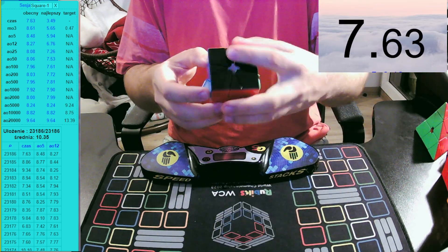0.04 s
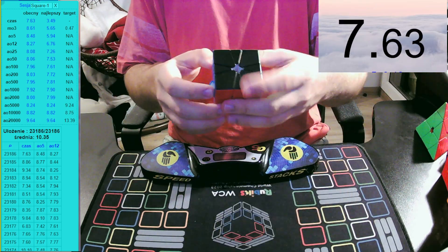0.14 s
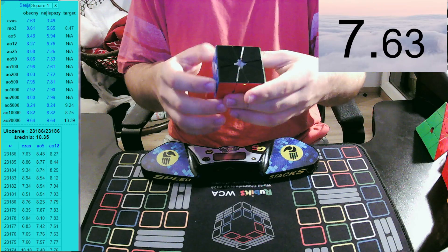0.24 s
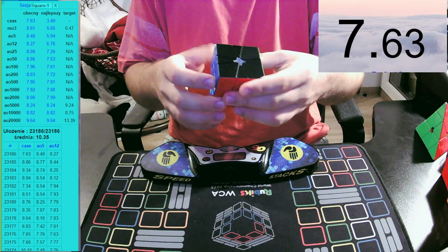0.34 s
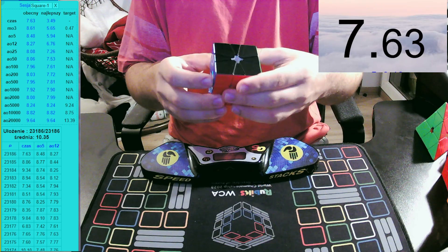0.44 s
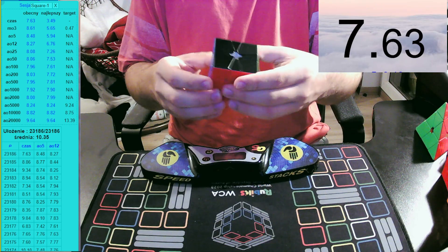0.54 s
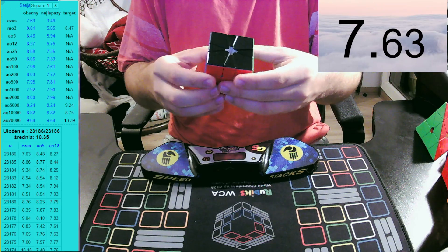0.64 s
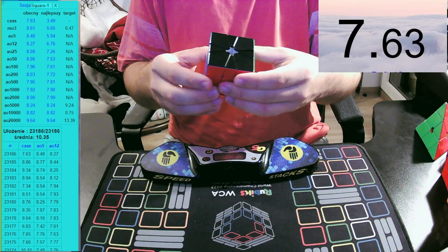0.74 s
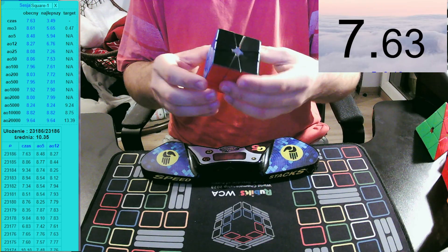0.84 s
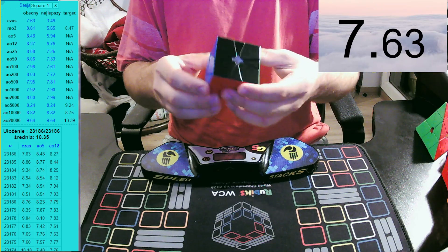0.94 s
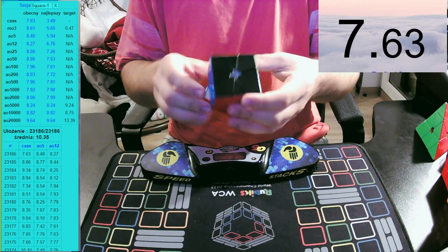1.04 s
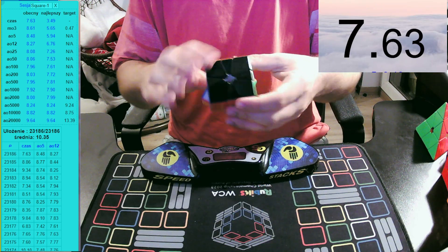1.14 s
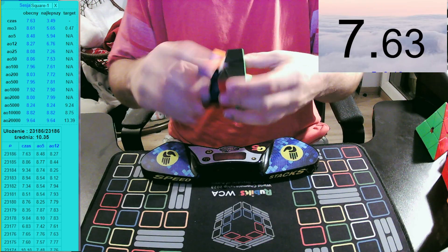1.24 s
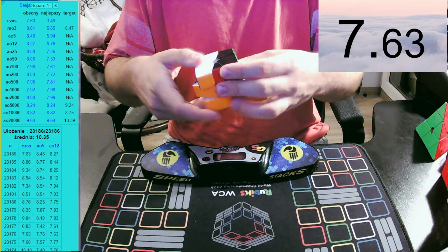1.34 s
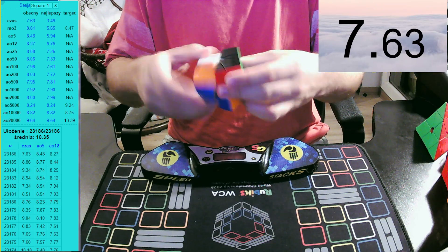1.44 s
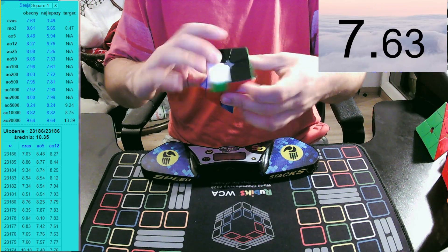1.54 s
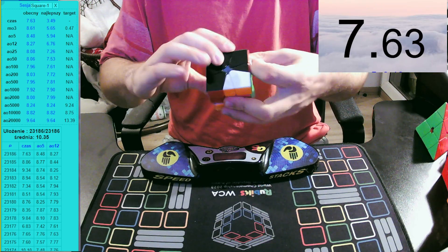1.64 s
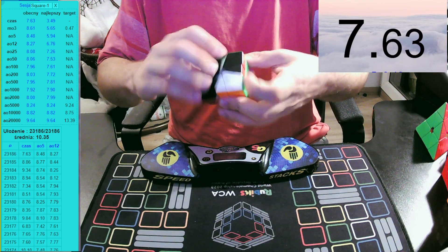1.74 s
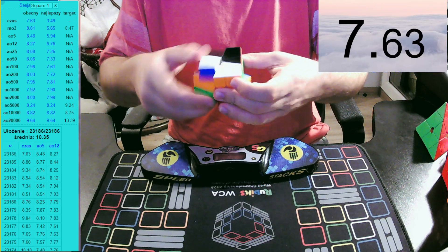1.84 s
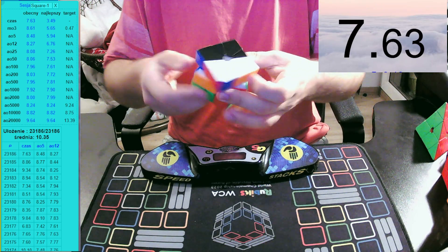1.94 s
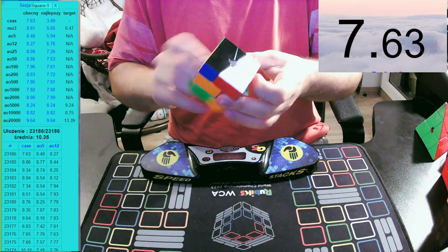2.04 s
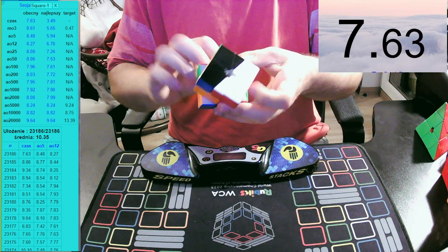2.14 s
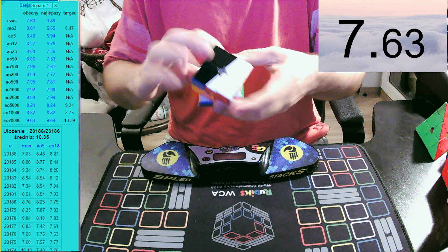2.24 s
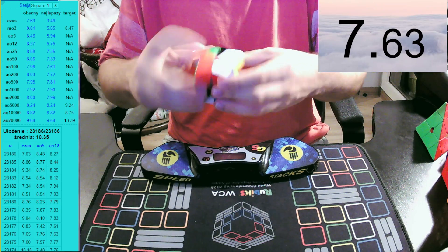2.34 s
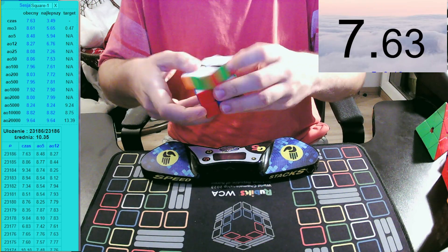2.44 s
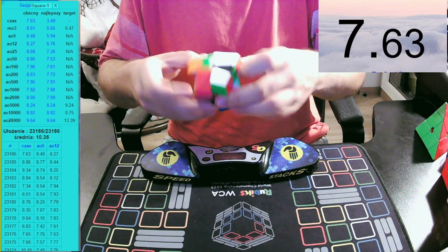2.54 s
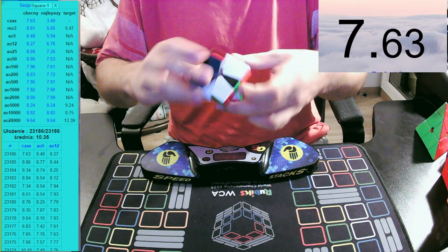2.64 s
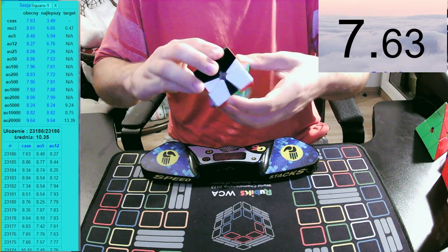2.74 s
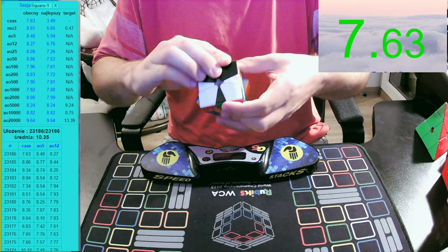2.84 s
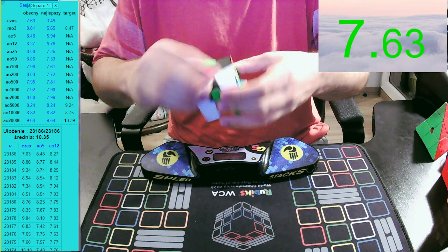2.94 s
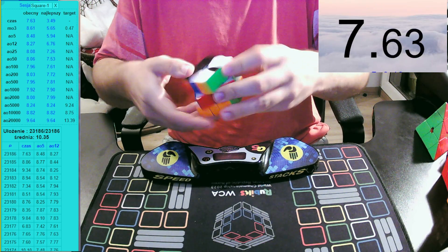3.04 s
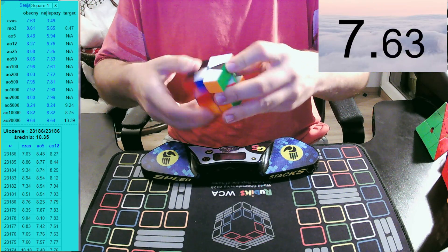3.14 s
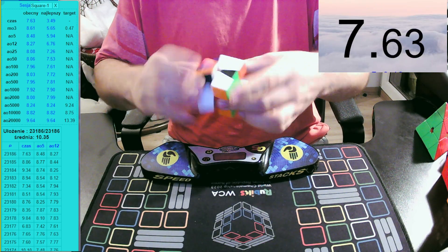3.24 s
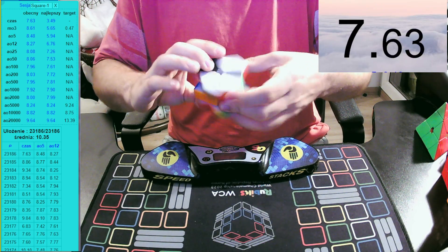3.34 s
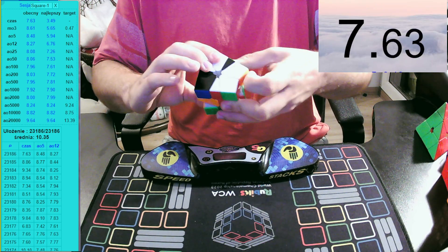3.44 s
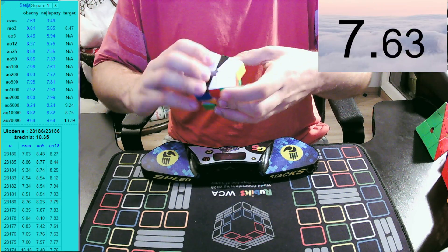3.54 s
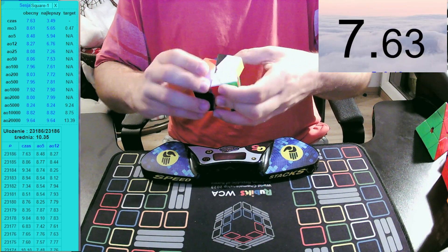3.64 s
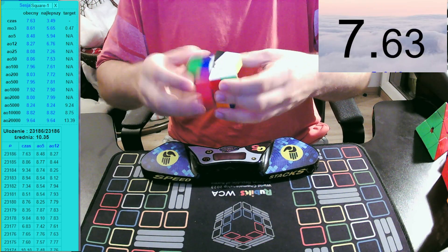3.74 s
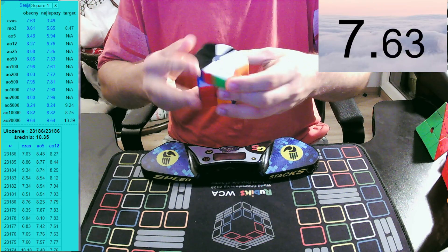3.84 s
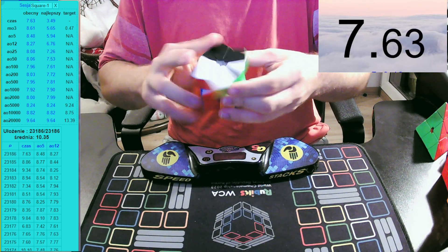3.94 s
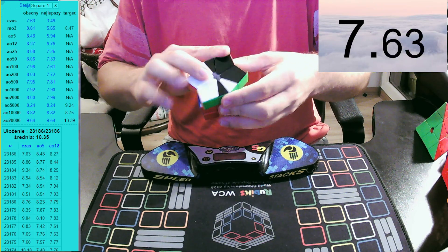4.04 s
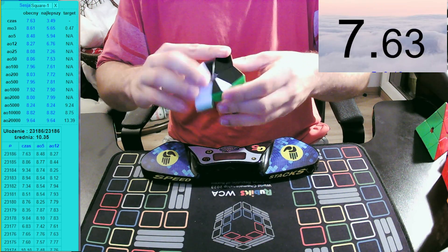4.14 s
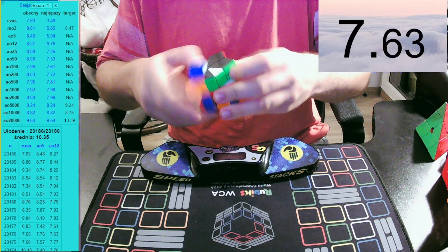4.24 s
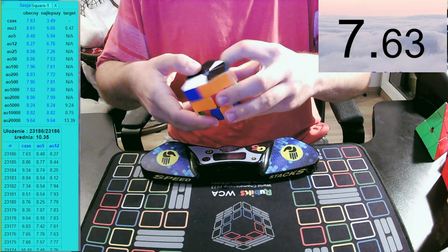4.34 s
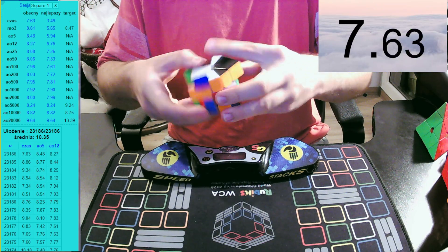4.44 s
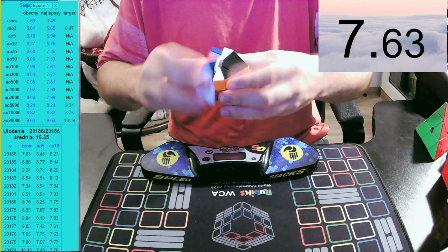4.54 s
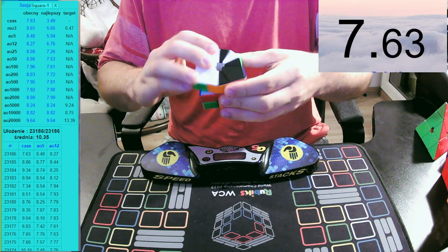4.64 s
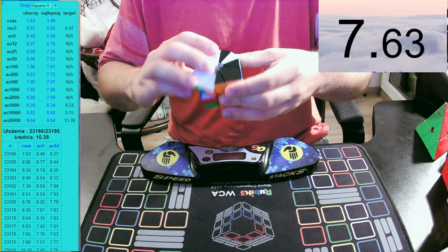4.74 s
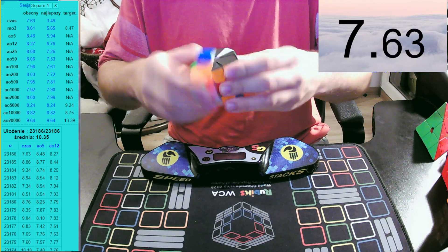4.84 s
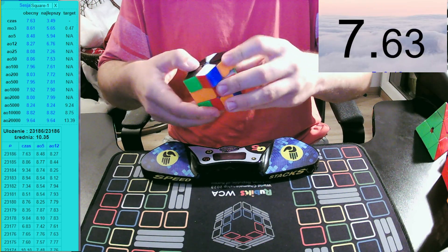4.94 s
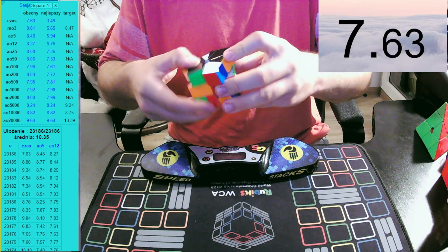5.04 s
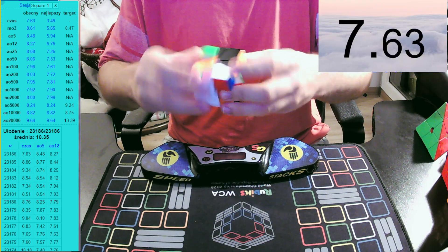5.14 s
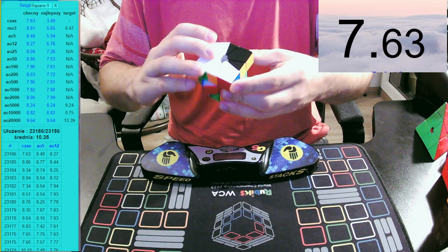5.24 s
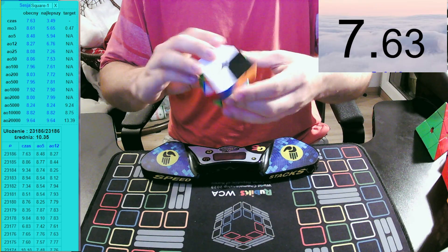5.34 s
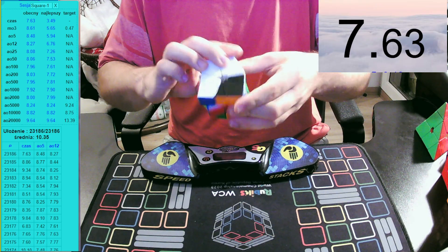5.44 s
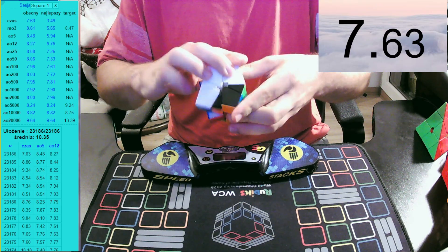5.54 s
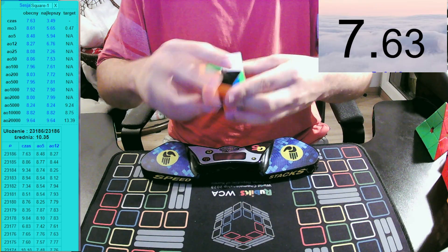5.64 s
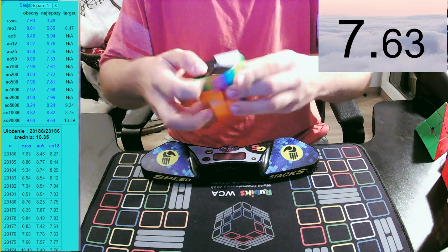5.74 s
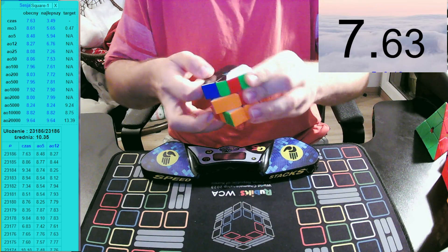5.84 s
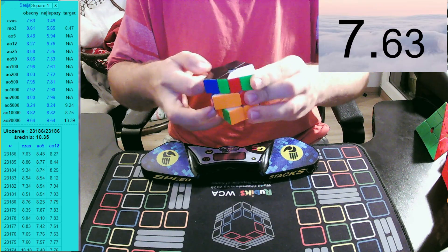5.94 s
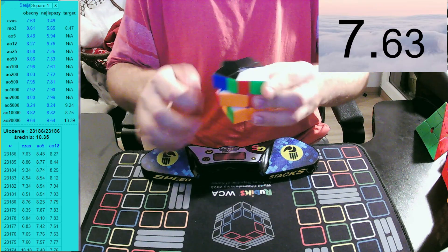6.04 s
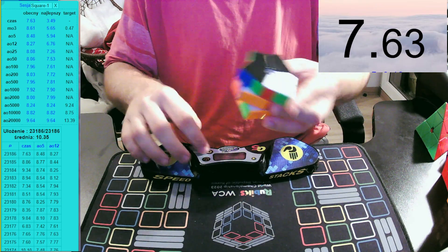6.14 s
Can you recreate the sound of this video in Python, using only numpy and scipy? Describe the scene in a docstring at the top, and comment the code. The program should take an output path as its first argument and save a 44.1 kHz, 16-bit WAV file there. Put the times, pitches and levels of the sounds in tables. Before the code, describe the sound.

A plastic puzzle cube is twisted in fast clacking bursts close to the microphone, rattling and sliding in a small humming room, ending with a soft thud.

```python
"""In a small room, a plastic puzzle cube is turned in quick bursts over a desk, close to the microphone.
Each turn ends in a clack: random knocks coloured by the resonances of loose hollow pieces.
Between the clacks the layers slide and rattle, made of small ticks and a dry hiss.
Mains hum and low room noise lie underneath, made of sine waves and shaped noise.
A low ring of two sine waves dies away from the start, and a soft thud comes at the end."""
import sys
import numpy as np
from scipy import signal
from scipy.fft import rfft, irfft
from scipy.io import wavfile

SR = 44100
rng = np.random.default_rng(int(sys.argv[2]) if len(sys.argv) > 2 else 0)


def put_to_file(sound):
    """Save the sound as 16-bit audio at rate SR, in the file named by the first command-line argument."""
    columns = np.atleast_2d(sound).T  # one column per channel
    safe = np.clip(columns, -1, 1)
    whole_steps = np.round(safe * 32767)
    wavfile.write(sys.argv[1], SR, whole_steps.astype(np.int16))


N = 272979
TIME = np.arange(N) / SR  # seconds

# The clacks of the cube. Each row: time of the hit in seconds, relative level in dB,
# hardness of the contact in dB, extra length of the rattle in ms.
CLACK_LIST = [(0.0652, -55, 2, 0.66), (0.1098, -61, -5, 4.4), (0.2518, -60.5, -3, .6),
              (0.3419, -62.5, 4.5, .6), (0.7278, -66.5, 4.5, .9), (0.817, -58.5, -3.5, 0.96),
              (0.9408, -59.5, -1, 10), (0.9822, -53.5, -5.5, 2.5), (1.054, -61, 1, 3.7),
              (1.1918, -37.5, -2.5, 4.3), (1.2114, -45.5, 6.5, 1.5), (1.252, -49.5, 0, .7),
              (1.2946, -35.5, -0.5, 1.7), (1.4169, -38, 0.5, 0.51), (1.4493, -41, -1, 1.4),
              (1.5027, -38, -2, 7.2), (1.538, -44.5, -1, 1.4), (1.5753, -40, 7, 2.1),
              (1.6408, -48.5, -3, 1.2), (1.6831, -41.5, -6.5, 3.7), (1.7305, -36.5, 5.5, 6.4),
              (1.7974, -49, -2.5, 1.6), (1.86, -45, -0.5, 7.8), (1.9644, -48.5, 0, .8),
              (1.993, -47, -4, 1.4), (2.0322, -46.5, -1.5, .5), (2.1742, -56.5, -6, 1.1),
              (2.2687, -45, -2.5, 1.1), (2.3095, -45, 2, 7.5), (2.332, -41, 0.5, 1.4),
              (2.349, -39.5, 6, 1.8), (2.3774, -29.5, 1, .8), (2.3901, -32, -3.5, 2.2),
              (2.474, -40, -1, 4.4), (2.4925, -38.5, 5.5, 7), (2.59, -43, -1, 1.2), (2.665, -44, -4.5, 2.8),
              (2.6769, -42, 2.5, 0.46), (2.7642, -44.5, -1.5, 0.89), (2.829, -50, 4, .9),
              (2.8756, -47.5, -6, 10), (2.8887, -43, 7.5, 0.45), (2.9013, -49, 3, 1.7),
              (2.9596, -36.5, 3.5, 2.8), (2.9997, -29, -0.5, 2.6), (3.1203, -46, -1, 9.1),
              (3.1545, -43.5, 1, 5.1), (3.19, -50.5, 2.5, 1.6), (3.2191, -44, 1, 8.8),
              (3.254, -49.5, -2.5, 5.9), (3.3093, -49.5, -9, 7.6), (3.3297, -40, -0.5, 1.1),
              (3.3405, -45.5, -8.5, 1.3), (3.477, -52.5, -6, 0.97), (3.535, -51.5, 2, 8.1),
              (3.549, -48.5, 1, 0.92), (3.5806, -40.5, -3, 0.31), (3.6851, -53, -5.5, 1),
              (3.7388, -47, -1.5, 5.5), (3.751, -48, -2.5, 7.6), (3.8271, -39, -3, 2.4),
              (3.8959, -41, 4, 6.9), (3.9262, -48.5, -2.5, 1.1), (3.9589, -45.5, 0.5, 1.1),
              (4.1329, -45.5, 1, 4.2), (4.2056, -43.5, -2.5, 2.3), (4.2558, -32, 1, 1.5),
              (4.2906, -36.5, -2, 0.81), (4.3982, -44.5, -7.5, 1.5), (4.409, -45, 6.5, 0.92),
              (4.455, -43, -1.5, 1.9), (4.4797, -43.5, -2.5, 4.7), (4.514, -45, -3, 2.6),
              (4.7144, -56, 2.5, 3), (4.7433, -48, 3.5, 1.1), (4.768, -47, 2.5, 4.5),
              (4.8185, -40, 2.5, 5.3), (4.8889, -54.5, 1.5, .8), (5.016, -47.5, -1, 0.83),
              (5.021, -45, 2, .6), (5.0419, -41.5, -0.5, 2), (5.112, -49.5, 2, 2.7), (5.142, -47, 1, 4.2),
              (5.221, -60.5, 5, 4.3), (5.3057, -54, -1.5, 3.1), (5.3488, -56.5, -4, 0.52),
              (5.5168, -61.5, 0.5, 0.98), (5.5667, -53.5, -7.5, 3.4), (5.6243, -51.5, -3, .6),
              (5.659, -52, -6, 0.61), (5.6812, -49, 4.5, 0.45), (5.71, -46, -1, 9.7),
              (5.723, -45.5, 0, 1.3), (5.738, -47, -5.5, 1.6), (5.7598, -39.5, 2.5, 1.5),
              (6.1284, -61, 2.5, 0.7)]
# Colour of a contact between plastic pieces. Each row: frequency in Hz, relative level in dB per Hz.
PLASTIC_COLOUR = [(300, -21), (600, -20.5), (900, -14.5), (1200, -12.5), (1700, -3.5), (2250, -4),
                  (3000, -4.5), (4800, -1), (6200, -5.5), (7600, -4), (9000, -9.5), (11000, -9.5),
                  (13000, -15.5), (16000, -22.5)]
GRAZE_S = .004  # a layer grazes its stop for this long before it hits


def amp(db):
    """Turn decibels into a plain factor."""
    return 10 ** (np.asarray(db) / 20)


def evened(x):
    """Scale a sound to an rms level of 1."""
    return x / np.sqrt(np.mean(x ** 2) + 1e-20)


def read(points, hz):
    """Join the points of a spectrum by straight lines over log frequency."""
    f, value = np.transpose(points)
    return np.interp(np.log(hz + 1), np.log(f + 1), value)


def add(mix, s, sound):
    """Lay a sound into the mix from s seconds on."""
    part = mix[max(round(s * SR), 0):][:len(sound)]
    part += sound[:len(part)]


def noise(points):
    """Steady noise of rms 1 with the given spectrum."""
    gain = amp(read(points, np.fft.rfftfreq(N, 1 / SR)))
    return evened(irfft(rfft(rng.standard_normal(N)) * gain, N))


def causal(gain):
    """The spectrum with these gains that starts at once and rings afterwards (minimum phase)."""
    cepstrum = irfft(np.log(np.maximum(gain, 1e-5)))
    half = len(cepstrum) // 2
    # fold the part before time zero onto the part after it
    cepstrum[1:half] *= 2
    cepstrum[half + 1:] = 0
    return np.exp(rfft(cepstrum))


def tone(hz):
    """A sine wave of rms 1 that starts at a random point of its cycle."""
    return np.sqrt(2) * np.sin(2 * np.pi * (hz * TIME + rng.random()))


def background(air_db=-68, sway_db=-51):
    """Room noise, steady hum, rumble and a slow sway of pressure far below hearing."""
    # Room noise. Each row: frequency in Hz, relative level in dB per Hz.
    air = [(12, -4.5), (24, 4.5), (55, -16.5), (170, -12.5), (300, -16), (450, -17.5), (700, -25),
           (1200, -29.5), (2000, -32.5), (4000, -37.5), (9000, -38.5), (16000, -40.5)]
    # Steady hum. Each row: frequency in Hz, rms level in dB.
    hum_tones = [(94, -80), (120, -67), (459, -85)]
    # Loudness of the low rumble over time. Each row: time in seconds, rms level in dB.
    rumble_levels = [(0, -55.5), (.5, -64), (1.3, -66), (6.2, -87)]
    hum = sum(amp(db) * tone(hz) for hz, db in hum_tones)
    rumble_db = np.interp(TIME, *np.transpose(rumble_levels))
    rumble = amp(rumble_db) * noise([(8, -29), (27, -3), (70, -18.0), (600, -59.5)])
    sway = noise([(2, -25), (4.5, 0), (6, -16), (100, -110)])
    return amp(air_db) * noise(air) + hum + rumble + amp(sway_db) * sway


def low_ring():
    """Two resonances close in pitch beat against each other as they fade."""
    # Each row: frequency in Hz, rms level at the start in dB, time to fade by 60 dB in seconds.
    ring_modes = [(265.3, -61.5, 4.04), (280.8, -64, 5.5)]
    return sum(amp(db - 60 * TIME / t60) * tone(hz) for hz, db, t60 in ring_modes)


def piece(hz, grip_db=2.5, detune=0.019):
    """Gains of one struck piece; the grip changes the pitch and strength of its resonances each time."""
    # Resonances of the hollow pieces. Each row: frequency in Hz, width in Hz, average lift in dB.
    shell = [(1146, 120, 7.5), (1620, 120, 0), (2132, 226, 4), (2320, 140, 5), (2745, 174, 2.5),
             (4940, 170, 0), (7710, 110, -5.5)]
    colour_db = read(PLASTIC_COLOUR, hz)
    for mode_hz, width, lift_db in shell:
        a, b = rng.standard_normal(2)
        distance = 2 * (hz - mode_hz * (1 + detune * b)) / width
        colour_db = colour_db + (lift_db + grip_db * a) / (1 + distance ** 2)
    return amp(colour_db)


def rubbing_level(rub_db, swell_s, fade_s, shape=1.5, size=64):
    """A turn that clacks harder also rubs harder: a swell up to the stop, a fade after it."""
    middling_db, rub_follows = -45, 0.9  # the rubbing grows by this share of each dB above middling
    t = TIME[::size, None]
    s, level_db, *_ = np.transpose(CLACK_LIST)
    envelope = np.exp(-abs((t - s) / np.where(t < s, swell_s, fade_s)) ** shape)
    each = amp(rub_db + rub_follows * (level_db - middling_db)) * envelope
    return np.interp(TIME, t[:, 0], np.linalg.norm(each, axis=1))


def sliding(rub=0.34, count=12, size=1024):
    """Small ticks and a dry rub as the pieces slide past one another, loudest around each clack."""
    # Rubbing up to the stop, then rubbing that also lasts beyond it. Each holds: level for a
    # middling clack in dB, swell before it in seconds, fade after it in seconds.
    push = (-66.5, 0.033, .004)
    coast = (-69.5, 0.031, 0.07)
    hz, out = np.fft.rfftfreq(size, 1 / SR), np.zeros(N)
    for _ in range(count):
        strength = amp(5.5 * np.minimum(rng.exponential(1, N), 2.6))
        ticks = strength * (rng.random(N) < 100 / count / SR)  # 100 a second over all pieces
        scuff = rng.standard_normal(size) * np.exp(-TIME[:size] / .001)
        tick_sound = evened(irfft(rfft(scuff) * causal(piece(hz))))
        out += signal.oaconvolve(ticks, tick_sound)[:N]
    level = np.hypot(rubbing_level(*push), rubbing_level(*coast))
    return level * evened(evened(out) + rub * noise(PLASTIC_COLOUR))


def clack(level_db, hardness_db, rattle_ms, chatter=0.42, chatter_ms=5, graze=0.13, size=2048):
    """A layer grazes its stop and hits it; neighbouring pieces knock together and settle in milliseconds."""
    knock_hz, snap_hz = 1800, 6000  # the knock lies below the first, the snap above the second
    knock_db, snap_db = -11.5, -2.5  # at hardness 0, against the middle band
    ms = (TIME[:size] - GRAZE_S) * 1000  # the hit is at 0
    hz = np.fft.rfftfreq(size, 1 / SR)
    contacts = rng.choice([-1, 1], size) * rng.uniform(.4, 1, size) * (rng.random(size) < .25)
    rattle = contacts * (ms >= 0) * np.exp(-(abs(ms) / (1.1 + abs(rattle_ms))) ** 2)
    # the settling changes strength at random every 64 samples
    bounces = np.repeat(amp(4.5 * rng.standard_normal(size // 64)), 64)
    settling = rng.standard_normal(size) * bounces * (ms >= 0) * np.exp(-abs(ms) / chatter_ms)
    approach = contacts * (ms < 0) * (1 + ms / (1000 * GRAZE_S))
    force = evened(rattle) + chatter * evened(settling) + graze * evened(approach)
    spectrum, gain = rfft(force), piece(hz)
    # a soft contact moves the whole cube, a hard one the edges of its pieces
    low = 1 / (1 + (hz / knock_hz) ** 6)
    high = 1 / (1 + (snap_hz / (hz + 1)) ** 6)
    bands = (low, 1 - low - high, high)
    shares_db = (knock_db - hardness_db, 0, snap_db + hardness_db)
    balance = sum(band * amp(db) / np.linalg.norm(irfft(spectrum * gain * band))
                  for band, db in zip(bands, shares_db))
    return amp(level_db) * irfft(spectrum * causal(gain * balance))


def blows(rebound_ms=0.89):
    """All the clacks, and the loose pieces that fall back after most of them."""
    # Holds: share of clacks with a rebound, the two limits of its delay in seconds
    # (longest, shortest), level against the clack in dB.
    rebound = (0.8, 0.1448, 0.01, -15.5)
    share, longest_s, shortest_s, rebound_db = rebound
    rebounds = []
    for s, level_db, hardness_db, _ in CLACK_LIST:
        chance, when = rng.random(2)
        if chance < share:
            delay_s = longest_s + when * (shortest_s - longest_s)
            rebounds.append((s + delay_s, level_db + rebound_db, hardness_db, rebound_ms))
    return list(CLACK_LIST) + rebounds


def turns(rows, gain_db=20):
    """All the blows on one track, with the random details of each drawn anew on each call."""
    out = np.zeros(N)
    for s, *blow in rows:
        add(out, s - GRAZE_S, clack(*blow))
    return amp(gain_db) * out


def response(tail_db=-7, early_db=-15, build_s=0.0014, count=12, size=20000):
    """A few echoes from desk and walls, and a noise tail that fades at its own rate at each pitch."""
    # Reverberation of the room. Each row: frequency in Hz, time to fade by 60 dB in seconds.
    room_fade = [(500, 0.16), (1500, 0.27), (4500, 0.19), (9000, 0.19), (15000, 0.26)]
    hz, t, z = signal.stft(rng.standard_normal(size), SR, nperseg=256)
    fade = amp(-60 * t / read(room_fade, hz)[:, None])
    tail = signal.istft(z * fade, SR)[1][:size]
    tail *= 1 - np.exp(-(TIME[:size] / build_s) ** 2)
    early = np.zeros(size)
    early[(rng.uniform(.002, .02, count) * SR).astype(int)] = rng.choice([-1, 1], count)
    return (amp(tail_db) * evened(tail) + amp(early_db) * evened(early)) / np.sqrt(size)


def room(x, count=5):
    """Several random echo patterns take turns, so that no single one colours the whole room sound."""
    place = TIME / .017  # a new pattern every 17 ms, blended with the one before
    distance = abs((place - np.arange(count)[:, None] + 1) % count - 1)
    out = np.zeros(N)
    for d in distance:
        share = np.cos(np.pi / 2 * np.minimum(d, 1))
        out += signal.oaconvolve(x * share, response())[:N]
    return out


def thud(rise_s=.03):
    """A soft push sets the desk's lowest resonances going."""
    # Holds: start in seconds, level in dB before the modes are summed, time to fade by 60 dB in seconds.
    push_down = (6.115, -43, .8)
    # Resonances of the desk. Each row: frequency in Hz, relative level in dB.
    desk_modes = [(33, 0), (50, -4), (78, -10)]
    s, level_db, t60 = push_down
    t = np.maximum(TIME - s, 0)  # the sines stay at zero until the start
    modes = sum(amp(db) * np.sin(2 * np.pi * hz * t) for hz, db in desk_modes)
    return amp(level_db - 60 * t / t60) * (1 - np.exp(-t / rise_s)) * modes


def scene(width_db=-4, width_hz=4400):
    """The cube's sound and its echoes from the room; nearly mono, with a little width in the treble."""
    rubbing, rows = sliding(), blows()
    echoes_a = room(turns(rows) + rubbing) / np.sqrt(2)
    echoes_b = room(turns(rows) + rubbing) / np.sqrt(2)
    cube = turns(rows) + rubbing
    mid = cube + echoes_a + echoes_b + background() + low_ring() + thud()
    treble = signal.butter(8, width_hz, "high", fs=SR, output="sos")
    side = amp(width_db) * signal.sosfilt(treble, echoes_a - echoes_b)
    return np.array([mid + side, mid - side])


def record(dry):
    """The recorder's band limit: a steep filter removes what lies above its edge."""
    edge_hz = 16350
    lowpass = signal.firwin(511, edge_hz, window=("kaiser", 9), fs=SR)
    return signal.oaconvolve(dry, lowpass[None], "same")


dry = scene()
out = record(dry)
put_to_file(out)
```